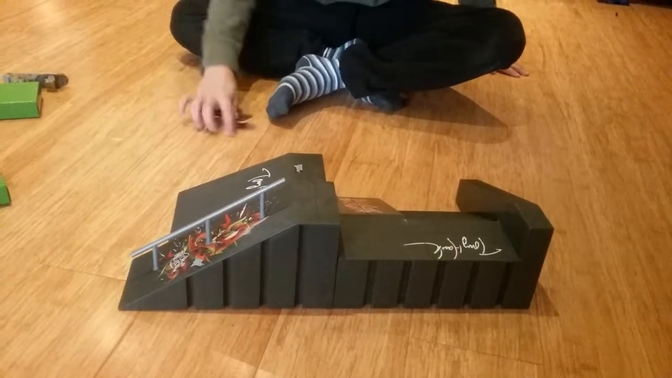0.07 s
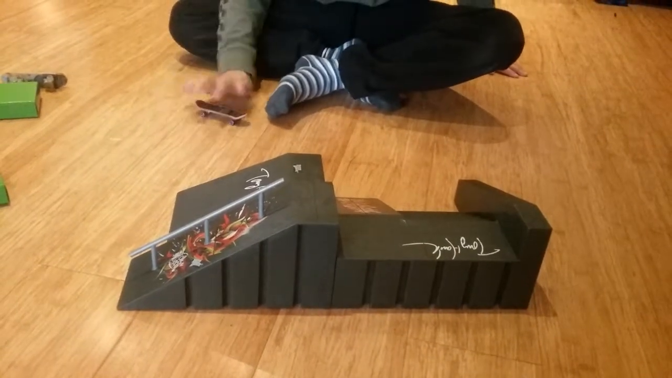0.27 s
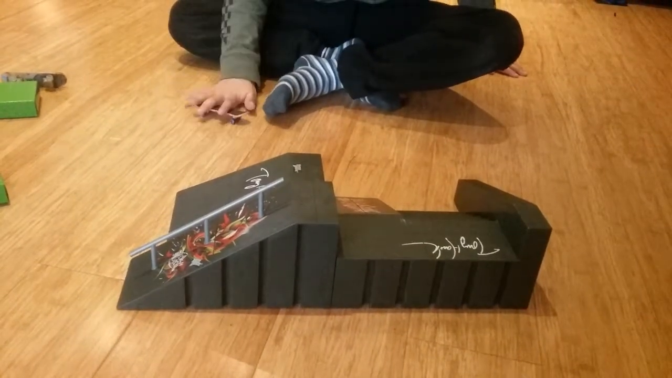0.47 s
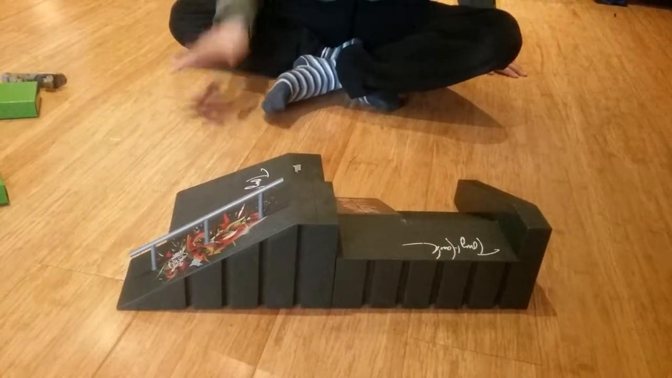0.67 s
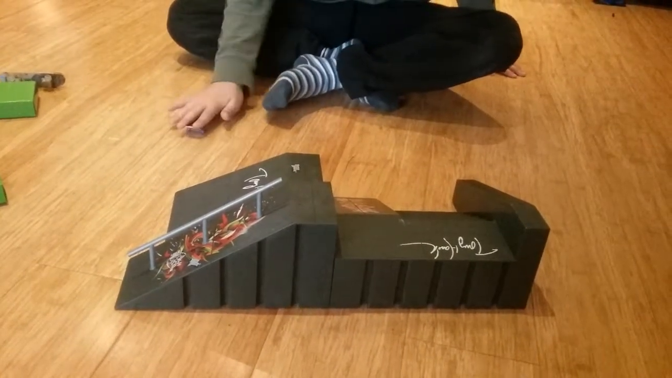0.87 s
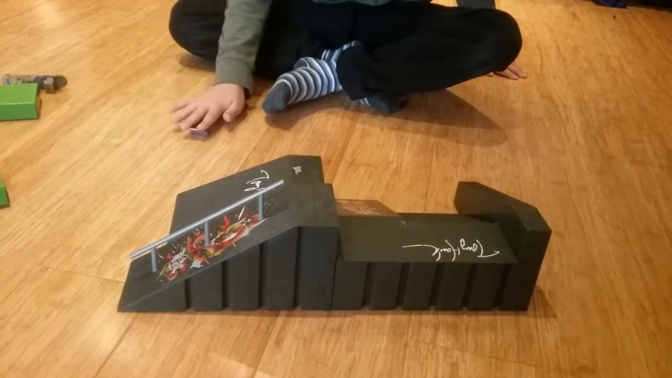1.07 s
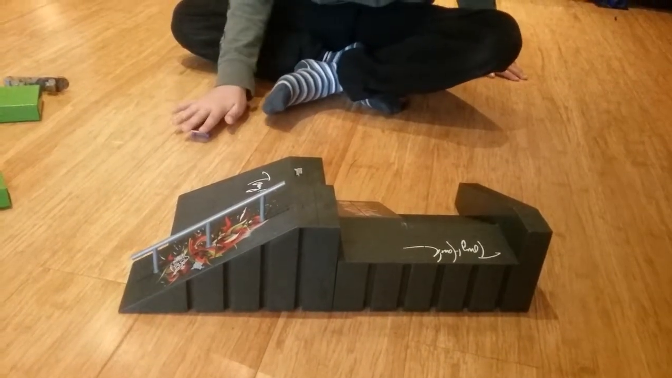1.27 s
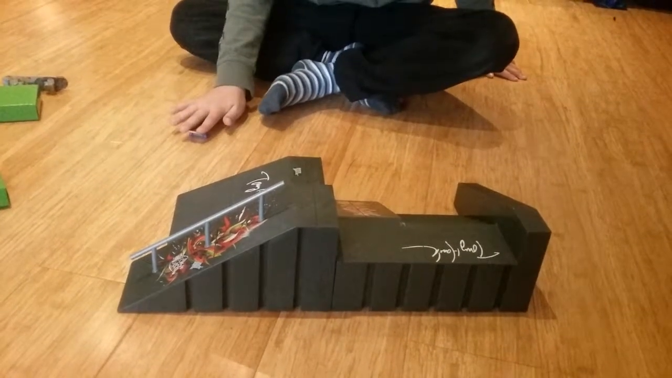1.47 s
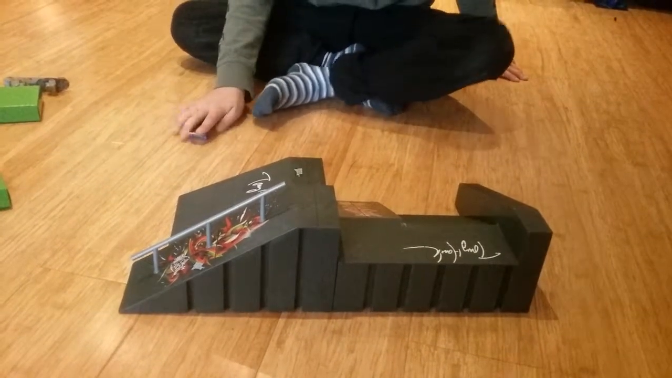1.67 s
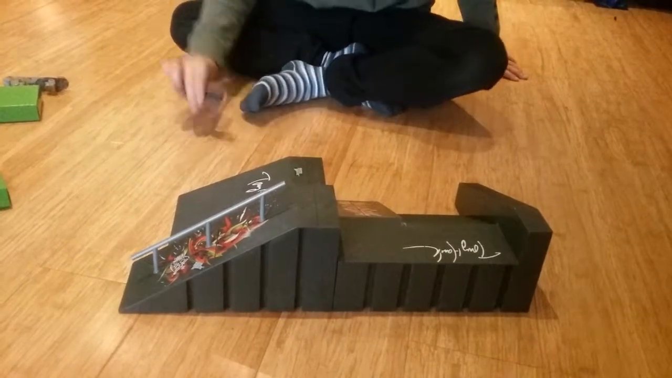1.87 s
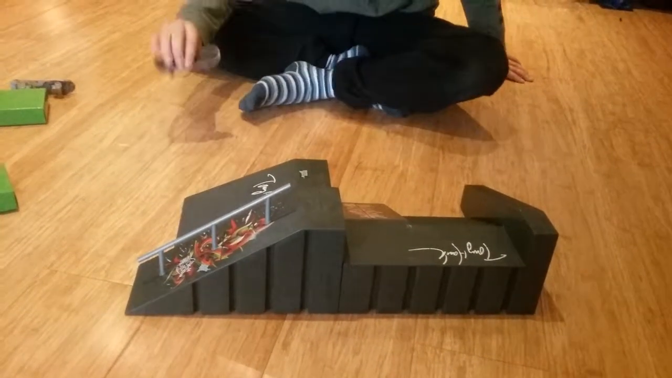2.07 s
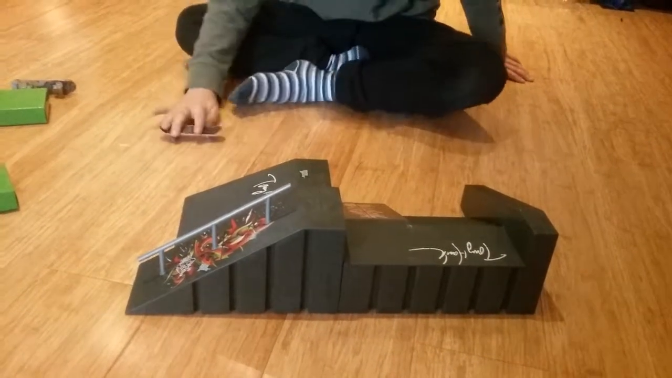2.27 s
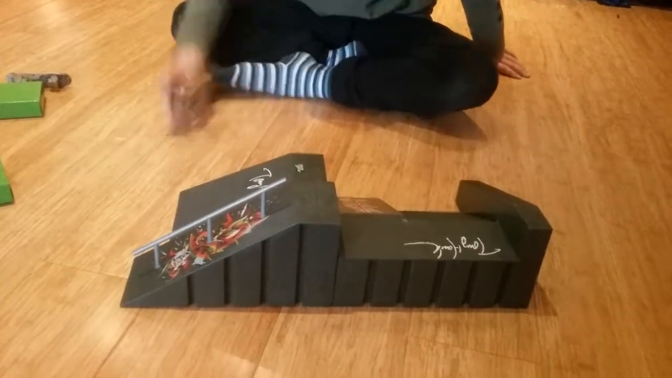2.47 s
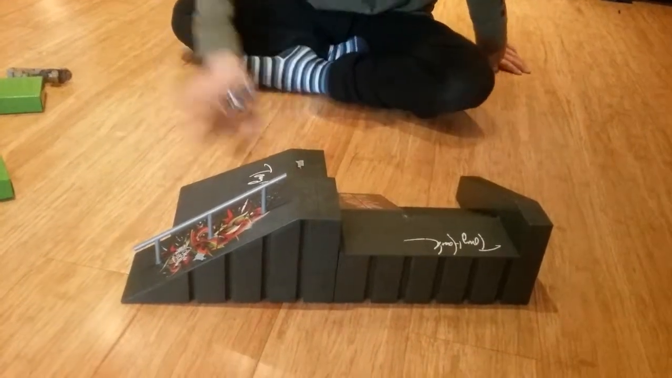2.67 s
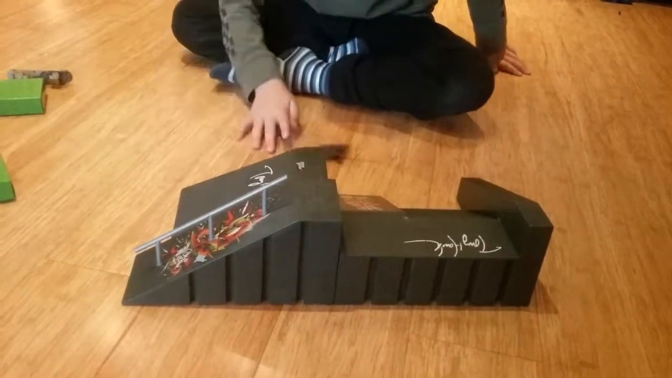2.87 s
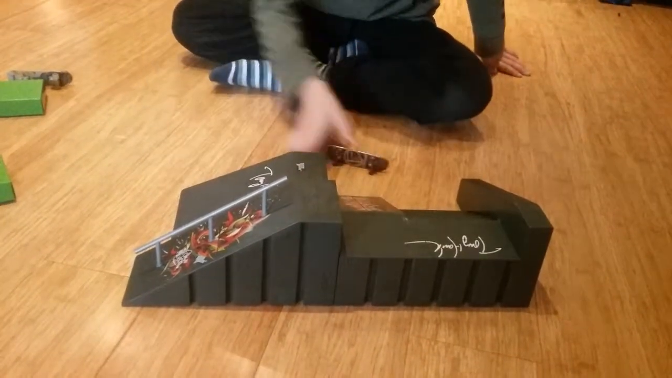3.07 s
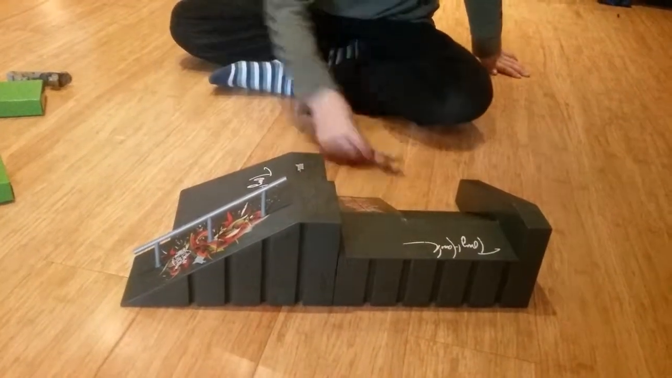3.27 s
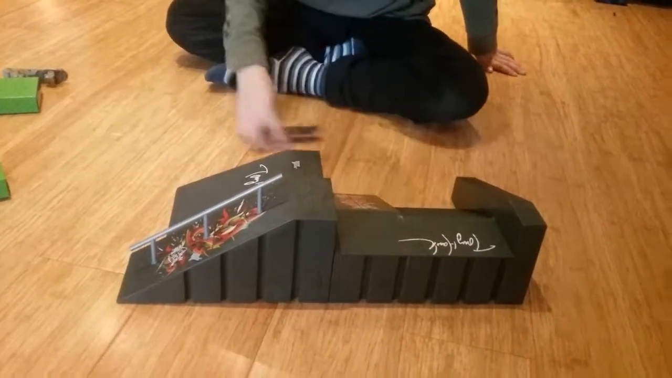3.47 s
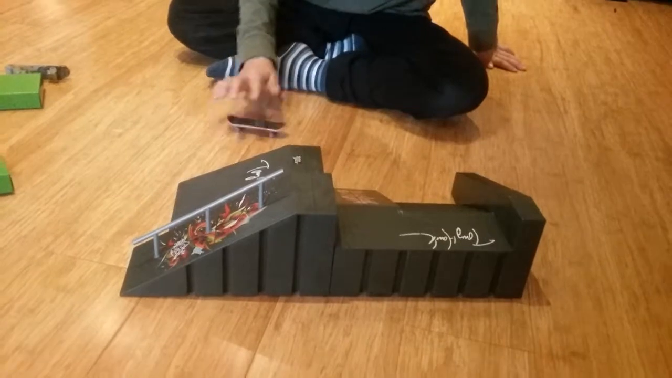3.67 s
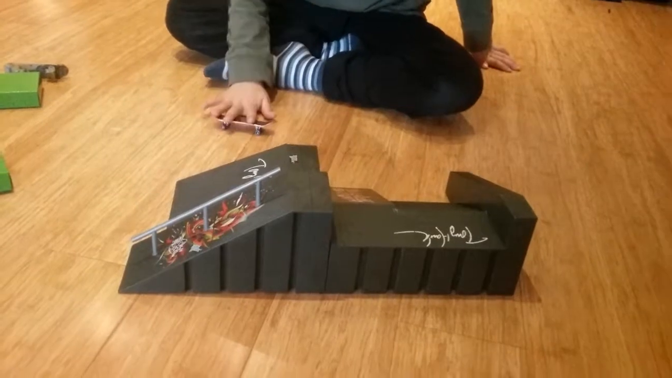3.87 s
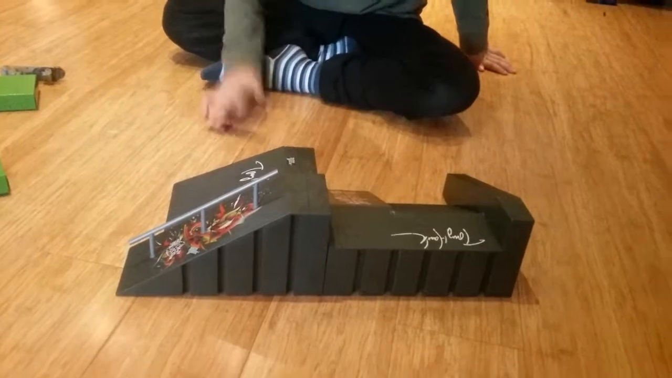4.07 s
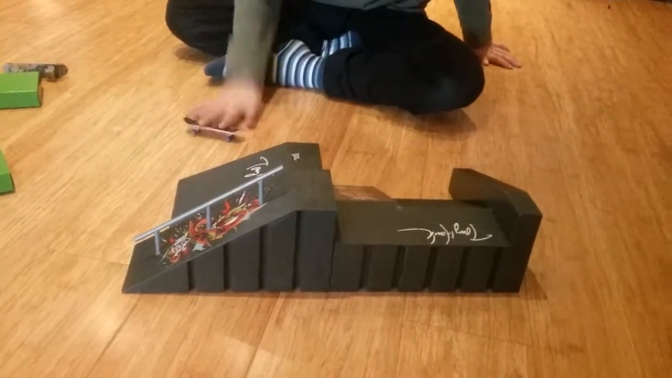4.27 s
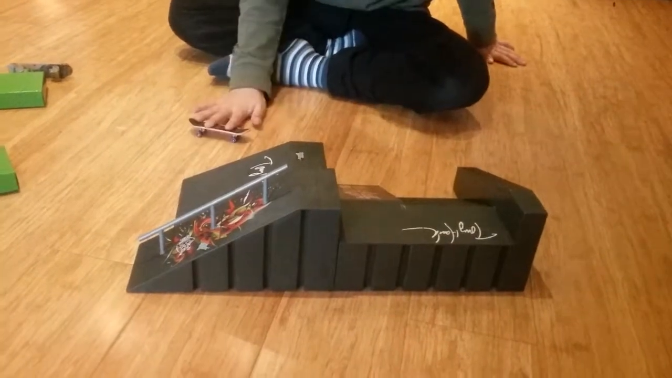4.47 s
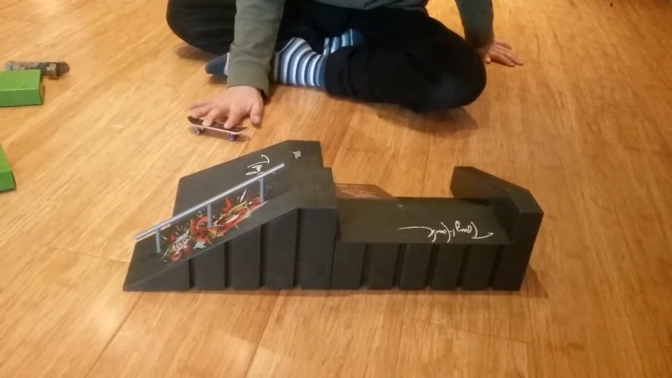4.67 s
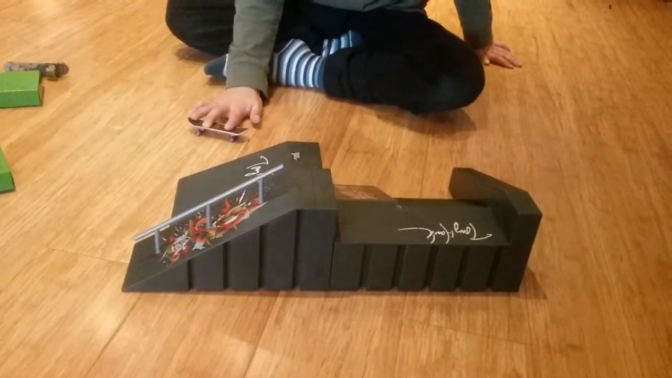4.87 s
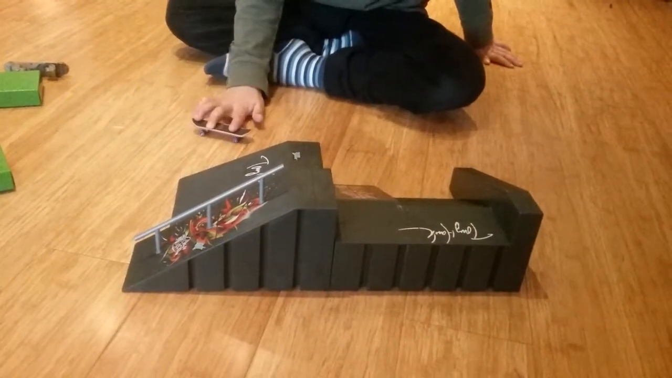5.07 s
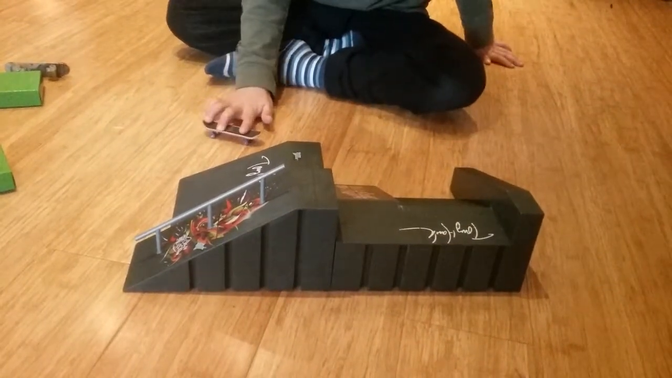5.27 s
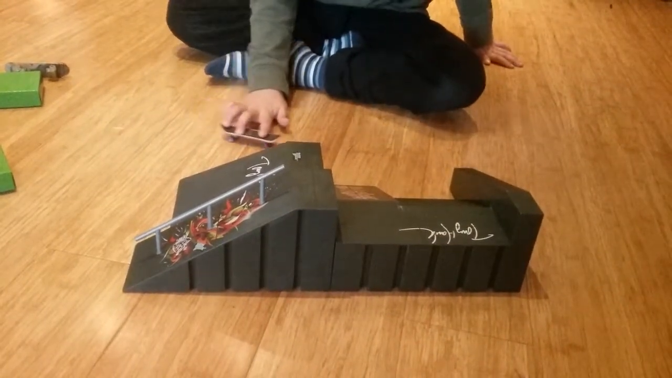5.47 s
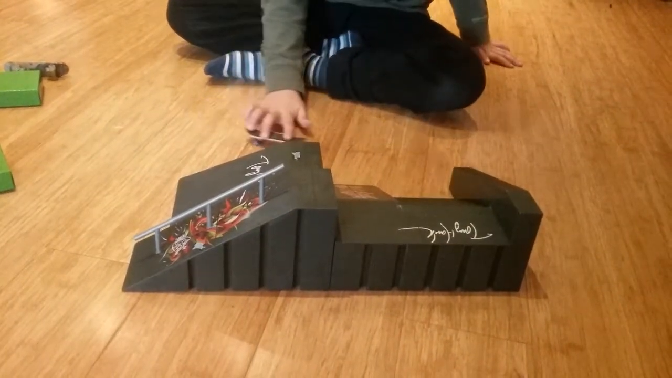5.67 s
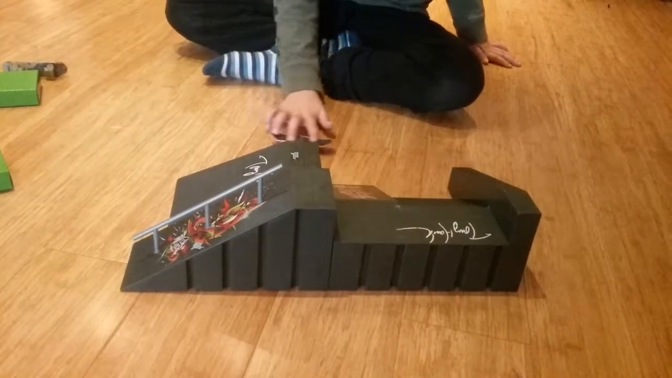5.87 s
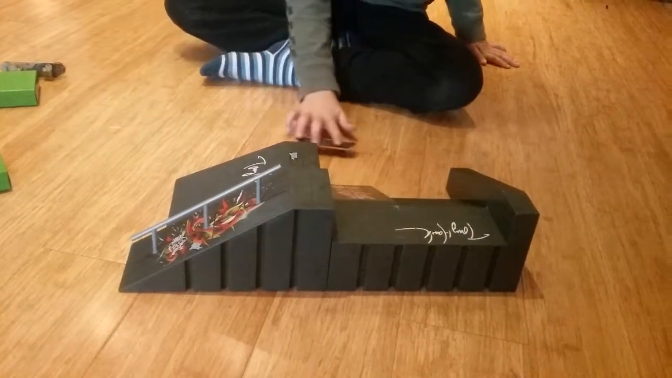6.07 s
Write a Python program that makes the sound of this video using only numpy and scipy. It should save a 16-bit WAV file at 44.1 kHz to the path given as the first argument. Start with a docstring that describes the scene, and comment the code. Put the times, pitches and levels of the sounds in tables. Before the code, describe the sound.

In a quiet, lightly reverberant room, a fingerboard clicks and clatters against nearby wooden floorboards. A few sharp clacks come first, then a lull with faint rubbing, then a busier run of snaps and landings with brief rolls and soft low bumps on the floor. The tricks finish with a loud, rapid slap, and after a pause the board rolls along softly, its wheels knocking lightly in the grooves.

```python
"""A fingerboard is popped, flipped and landed on a wooden floor in a live room, then rolls away.
Each impact excites the damped modes of the deck and its metal trucks. Between tricks the wheels roll
and bump over the grain, and the axles rub. Hand and feet brush the floorboards and thud on them,
launching dispersive bending waves. The room adds echoes, reverberation and standing waves;
beneath it all lie faint hiss, a low hum that stops early and a thin electronic whine."""
import sys
import numpy as np
from scipy import signal
from scipy.fft import rfft, irfft, next_fast_len
from scipy.io import wavfile

SR = 44100
rng = np.random.default_rng(int(sys.argv[2]) if len(sys.argv) > 2 else 0)


def unload_audio(sound):
    """Save the sound as a 16-bit wav file, at the path given as the first command line argument."""
    columns = np.transpose(np.atleast_2d(sound))
    # keep every value between -1 and 1, then stretch to whole-number steps
    steps = np.round(np.clip(columns, -1, 1) * 32767)
    wavfile.write(sys.argv[1], SR, steps.astype(np.int16))


N = 270099
TIME = np.arange(N) / SR
FREQS = np.fft.rfftfreq(4096, 1 / SR)
PUSH_S = 4.983  # start of the last, long push

# Broad response of the board on the floor: (frequency [Hz], gain [dB])
BOARD_RESPONSE = [(100, -38), (200, -32.5), (420, -16), (600, -5.5), (1000, -4.5), (1400, -5), (2000, -7),
                  (2700, -10.5), (4000, -8), (6600, -4.5), (7400, -5.5), (8300, -13.5), (12000, -16.5),
                  (16000, -17)]
# Modes of the board: (frequency [Hz], bandwidth [Hz], peak over the broad response [dB])
BOARD_RESONANCES = [(915.4, 160, 4), (1934, 370, 3), (3160, 170, 2), (3770, 460, 3.5), (5060, 750, 3),
                    (6210, 360, 4.5), (6737, 380, 5.5)]
# Contacts on the board, from the floor and from fingers pressing it before a pop: (time [s], level [dB], rattle
# decay [s], freedom to ring [factor], hardness [dB/octave], struck part's frequency [Hz], its peak [dB], direct
# left minus right [dB])
IMPACTS = [(-0.06, -10, 0.0023, 0.58, 5, 5440, 0.5, -2.0), (0.091, -24, 0.0022, 0.5, 1, 705, 19, -20),
           (0.0992, 10.0, 0.0016, 1.67, -2.5, 5700.0, 3, 6.5),
           (0.382, -18, 0.0058, 0.39, -8.5, 710, -2, -8.5), (0.3867, -15.0, 0.0021, 1.2, 1, 730, 6, -1.5),
           (0.569, -35, 0.0038, 0.4, 1, 9000.0, 5.5, 1), (0.589, -28.5, 0.0053, 0.5, -1, 1410.0, 10, 4.0),
           (0.5971, -4.0, 0.0054, 1.4, -1, 1760, 3.5, -2), (0.6345, -12, 0.0025, 0.52, 19, 6500, 4.5, -3.5),
           (0.747, 3.5, 0.0028, 1.15, -0.5, 1830, 7.0, -7), (0.799, 13, 0.0018, 2.08, 1.0, 1170, 4.5, -1.5),
           (1.0605, -31, 0.001, 0.92, 5, 6440, 5, 4), (1.869, -27, 0.0011, 0.62, 2.5, 7030, 9, -1),
           (2.137, -29, 0.0018, 0.8, 6, 5500.0, 4, -3), (2.267, 3.0, 0.00076, 1.3, 2.5, 665, 4.5, -3),
           (2.472, -23.5, 0.0043, 0.71, 1.5, 1320.0, 8, -3.0), (2.505, -16, 0.0064, 0.6, 2.5, 895, 11, 4),
           (2.51, 3, 0.0028, 1.94, 1.5, 2290, 5, -7), (2.5665, -4, 0.0019, 0.48, 17, 6300, 2, -6),
           (2.697, -22, 0.0021, 0.55, 8.5, 2200.0, 11, -6),
           (2.7808, -11.5, 0.0011, 0.46, 7.5, 5000.0, 0, 0.5),
           (2.8087, 12.5, 0.0012, 1.05, 2.5, 2790, 11.0, 1.0),
           (2.8208, 6, 0.00065, 0.35, -1.5, 2070, 10, -14), (3.2736, -6.5, 0.011, 0.7, 2.0, 3830, 6.5, -26),
           (3.2866, -10, 0.0012, 0.39, -1.0, 2780, 9, -4), (3.3904, -27.5, 0.0016, 0.6, 4.0, 6000.0, 6, -1),
           (3.4776, 4.5, 0.0045, 0.18, 4.5, 3870, 6, -10), (3.48, -5, 0.0013, 0.26, -6.5, 4500.0, 20, 12),
           (3.5479, -2.0, 0.00092, 1.1, -1.5, 3440, 6, -3.5),
           (3.8355, -10.5, 0.0049, 1.34, -7.0, 6500.0, 6, -7.5),
           (4.062, -36.5, 0.0021, 0.85, -5, 1540, 15, -13),
           (4.1146, -31.5, 0.002, 0.67, 4.0, 890, 12.5, 1.5),
           (4.1411, -0.5, 0.0019, 2, 2.0, 1860.0, 8, -13.5),
           (4.3084, 11.5, 0.0012, 1.7, 2, 2130, 15, -11.5),
           (4.3274, 9, 0.00073, 0.32, -4.5, 1568, 11.5, -9), (4.344, 12.5, 0.0012, 1.9, 0.5, 4800, 0.5, -8),
           (4.9721, -36, 0.0016, 0.37, 2.5, 2070.0, 4.5, 5)]
def clacks(part_octaves=0.51, tail_db=3.0, spill_db_per_db=0.21):
    """Impact excitation: the struck part rings most, hard contacts are brighter, a grip damps the modes."""
    out = np.zeros((2, N))
    body = curve_at(BOARD_RESPONSE, FREQS)
    modes = resonances(BOARD_RESONANCES, FREQS)
    octaves = np.log2(np.clip(FREQS, 780, 6000))  # hardness tilts this band
    for s, db, rattle_s, freedom, hardness_db, part_hz, part_db, pan_db in IMPACTS:
        # Floor and deck tail ring low, the deck in the middle, the trucks high.
        part = np.exp(-.5 * (np.log2((FREQS + 1) / part_hz) / part_octaves) ** 2)
        blow = ring(body + freedom * modes + hardness_db * octaves + part_db * part)
        path = contact_path(rattle_s, pan_db, tail_db + spill_db_per_db * db)  # strong blows spill more
        add(out, s, amp(db) * convolve(path, blow))
    return out


# The deck landing flat: (time [s], level [dB], frequency [Hz], time to fall 60 dB [s])
FLAT_LANDINGS = [(4.3285, -2, 1480, 0.013)]
def slaps(rise_s=0.0015, overtone_ratio=1.3, overtone_db=-6, pan_db=-2.0):
    """Damped free vibration: a flat landing radiates a short, woody ring of two partials."""
    out, t = np.zeros((2, N)), np.arange(2048) / SR
    for s, db, hz, t60 in FLAT_LANDINGS:
        phase = 2 * np.pi * hz * t
        deck = np.sin(phase) + amp(overtone_db) * np.sin(overtone_ratio * phase)
        envelope = (1 - np.exp(-(t / rise_s) ** 2)) * amp(-60 * t / t60)
        add(out, s, amp(db) * sides(pan_db) * deck * envelope)
    return out


# Response of the finger-damped deck: (frequency [Hz], gain [dB])
DAMPED_DECK = [(200, -29.5), (420, -21.5), (650, -1.5), (1100, 9), (1600, -1), (2600, -15.5), (3800, -15.5),
               (5000, -24), (6400, -13), (8300, -36.5), (16000, -49)]
# Wheels dropping into grain and joints: (time [s], level [dB], brightness [dB/octave])
WHEEL_DROPS = [(5.3544, -20.5, 3), (5.41, -36, 2), (5.4817, -15, -2.5), (5.6429, -17, -1),
               (5.6801, -11, 2.6), (5.704, -24.5, 8.5), (5.7671, -14, -1.5), (5.9027, -13, 0.5),
               (5.971, -22, -5), (6.0498, -21, 6), (6.0968, -22, 4)]
def bumps():
    """Damped impact: a wheel drops into a groove, and the fingers dull the deck's knock."""
    out, octaves = np.zeros((2, N)), np.log2(np.clip(FREQS, 500, 4000))
    for s, db, bright_db in WHEEL_DROPS:
        blow = ring(curve_at(DAMPED_DECK, FREQS) + bright_db * octaves)
        path = contact_path(rattle_s=0.0015, pan_db=-4, tail_db=-2.0)
        add(out, s, amp(db) * convolve(path, blow))
    return out


# Coasting after a landing: (start [s], duration [s], initial level [dB])
COAST_RUNS = [(2.818, 0.35, -44), (3.191, 0.059, -49.5), (3.516, .16, -45.5), (3.806, 0.022, -47.5)]
def rolling_strength(push_db=-50, run_up_s=.54, start_speed=.33, speed_power=2.59, slowing_db_per_s=44.5):
    """Power law of rolling noise: it grows with speed in the long push and fades as each coast slows."""
    run_up = np.clip((TIME - PUSH_S) / run_up_s, 0, 1)
    speed = start_speed + (1 - start_speed) * run_up ** 2  # share of full speed
    gain = amp(push_db) * (TIME > PUSH_S) * speed ** speed_power
    for s, length, db in COAST_RUNS:
        age = np.maximum(TIME - s, 0)
        settling = np.minimum(age / 0.027, 1)
        finger_stop = np.exp(-np.maximum(age - length, 0) / 0.02)
        gain += amp(db - slowing_db_per_s * age) * settling * finger_stop
    return gain


# Wheel noise through deck and floor: (frequency [Hz], gain [dB])
WHEEL_SPECTRUM = [(100, -31.5), (250, -29.5), (400, -16), (620, -1), (1150, 0), (1500, -4.5), (2100, -17),
                  (2600, -33.5), (4000, -34), (5000, -23.5), (6300, -22), (8300, -36), (16000, -39)]
def wheels(rolling):
    """Roughness excitation: the wood grain shakes the rolling wheels, and with them deck and floor."""
    return friction(rolling, WHEEL_SPECTRUM, per_s=880, spread_db=9.0)


def axle_whirr(band_hz=(1980, 2180), db=-72, length_s=0.52):
    """Narrow-band friction noise: the axles sing while the long push is still slow."""
    band = signal.butter(2, band_hz, "band", fs=SR, output="sos")
    rub = np.sqrt(N) * unit(signal.sosfilt(band, rng.standard_normal((2, N))))
    return amp(db) * np.sqrt(arch(PUSH_S, length_s)) * rub


# Spectrum of rubbing: (frequency [Hz], gain [dB])
RUB_SPECTRUM = [(100, -16), (400, -1.5), (1000, -11.5), (1500, -10.5), (2050, 0.5), (2800, -4.5),
                (4000, -2), (5000, -4.5), (6400, 1), (8300, -12), (16000, -17.5)]
# Strokes of fingers and board over the floor: (start [s], duration [s], level [dB])
RUB_STROKES = [(-.1, 0.27, -80.5), (1.202, 0.071, -71), (1.676, 0.22, -63.5), (1.832, 0.54, -67.5),
               (2.219, 0.24, -64.5), (2.512, 0.075, -60), (2.71, 0.54, -59.5), (3.185, 0.14, -52.5),
               (3.3, 0.92, -68), (4.048, 0.22, -63.5), (4.922, 0.26, -76)]
def brushing(rolling, axle_db=-16.5):
    """Sliding friction: each stroke swells and fades, and the axles rub in step with the wheel noise."""
    strokes = sum(amp(db) * arch(s, length) ** 0.99 for s, length, db in RUB_STROKES)
    return friction(strokes + amp(axle_db) * rolling, RUB_SPECTRUM, per_s=1900, spread_db=5.0)


def friction(gain, spectrum, per_s, spread_db):
    """Shot noise: countless tiny collisions with the wood grain sound through the board and the room."""
    sizes = amp(spread_db * np.minimum(rng.exponential(1, N), 4)) * rng.choice([-1, 1], N)
    collides = rng.random(N) < per_s / SR
    grains = np.sqrt(N) * unit(sizes * collides) * gain
    path = contact_path(rattle_s=0.00026, pan_db=-3.0, tail_db=1.0)
    response = convolve(path, ring(curve_at(spectrum, FREQS)))
    return convolve(response, grains)[:, :N]


# Soft blows of hand and feet: (time [s], level [dB], lower band edge [Hz], left minus right [dB])
FLOOR_BLOWS = [(0.091, -28.5, 180, -4), (0.374, -28, 170, -2.5), (0.591, -31.5, 191, 1),
               (0.747, -30, 192, -1.5), (0.795, -22.5, 62, -11), (2.265, -32.5, 149, -2),
               (2.435, -31, 172, 1), (2.503, -31.5, 152, 1), (2.539, -25.5, 65, 13), (2.596, -36.5, 84, 12),
               (2.806, -25, 60, 6.5), (3.476, -39, 129, 2), (3.713, -32.5, 74.4, 12.5),
               (3.826, -34.5, 173, 6), (4.094, -38, 54.7, 17), (4.156, -28.5, 108, 17.5),
               (4.328, -28.5, 55, 6)]
def thuds(top_hz=320, lag_s=0.011, lag_hz=70, tail_db=-7, scatter=0.86, scatter_s=0.075):
    """Dispersion: low bending waves lag and scatter at the planks' edges, so each thud sinks and blurs."""
    out, t = np.zeros((2, N)), np.arange(2048) / SR
    hz = np.fft.rfftfreq(SR // 4, 1 / SR) + 1
    group_delay = np.maximum(lag_s * (np.sqrt(lag_hz / hz) - np.sqrt(lag_hz / 600)), 0)
    travel = np.exp(-2j * np.pi * np.cumsum(group_delay) * (hz[1] - hz[0]))
    for s, db, low_hz, pan_db in FLOOR_BLOWS:
        band = signal.butter(3, [low_hz, top_hz], "band", fs=SR, output="sos")
        spectrum = signal.sosfreqz(band, hz, fs=SR)[1] / np.sqrt(hz)
        wave = unit(irfft(spectrum * travel))
        scattered = unit(rng.standard_normal(len(t)) * np.exp(-t / scatter_s))
        planks = unit((t == 0) + scatter * scattered)
        path = amp(tail_db) * room_tail()
        add(path, 0, np.array([planks, planks]))
        add(out, s, amp(db) * sides(pan_db) * convolve(path, wave))
    return out


# Echoes off nearby surfaces: (delay [s], left gain [dB], right gain [dB])
EARLY_REFLECTIONS = [(.0034, -14, -5), (.0113, -6, -17), (0.014, -15, -20), (0.0234, -13, -16)]
def contact_path(rattle_s, pan_db, tail_db, shared=0.59, rise_s=0.0012):
    """Multipath propagation: a contact's chatter arrives directly, as echoes and as a diffuse tail."""
    t = np.arange(1024) / SR
    chatter = rng.standard_normal((3, len(t))) * np.exp(-t / rattle_s) * (1 - np.exp(-t / rise_s))
    spectrum = rfft(chatter[:2] + shared * chatter[2])
    direct = unit(irfft(spectrum / np.sqrt(abs(spectrum) + 1e-12)))  # hard contacts have flatter spectra
    out = amp(tail_db) * room_tail()
    add(out, 0, direct * sides(pan_db))
    for delay, left_db, right_db in EARLY_REFLECTIONS:
        add(out, delay, direct * amp([[left_db], [right_db]]))
    return out / np.sqrt(np.sum(out ** 2) / 2)


# Reverberation time: (frequency [Hz], time to fall 60 dB [s])
REVERB_TIMES = [(80, 0.33), (200, 0.48), (600, 0.33), (1400, 0.4), (3500, 0.38), (6300, 0.39), (9000, 0.32),
                (15000, 0.32)]
# Sound thrown back by the walls: (frequency [Hz], level [dB])
WALL_SPECTRUM = [(300, 0.5), (700, 0.5), (1400, -1.5), (3500, -1), (6300, -2), (8500, -4), (15000, 0.5)]
def room_tail(build_s=0.0064, coherent_hz=330):
    """Diffuse reverberation: it builds up, each band decays at its own rate, and both sides share bass."""
    hz, t = np.fft.rfftfreq(256, 1 / SR)[:, None], np.arange(190) * 128 / SR
    real, imag = rng.standard_normal((2, 2, len(hz), len(t)))
    left, independent = real + 1j * imag
    coherence = np.exp(-.5 * (hz / coherent_hz) ** 2)
    right = coherence * left + np.sqrt(1 - coherence ** 2) * independent
    decay = amp(curve_at(WALL_SPECTRUM, hz) - 60 * t / curve_at(REVERB_TIMES, hz))
    tail = signal.istft(np.array([left, right]) * decay)[1]
    build_up = 1 - np.exp(-np.arange(tail.shape[1]) / SR / build_s)
    return unit(tail * build_up)


# Modes between floor and walls: (frequency [Hz], bandwidth [Hz], peak [dB])
ROOM_RESONANCES = [(367, 14, 9), (624, 13, 8), (737, 16, 7.5), (797, 16, 4), (893, 20, 3), (1415, 16, 4),
                   (1834, 14, 4), (1879, 14, 4)]
def standing_waves(sound):
    """Room resonance: standing waves reinforce and prolong narrow bands of the sound."""
    modes = resonances(ROOM_RESONANCES, np.fft.rfftfreq(16384, 1 / SR))
    return convolve(sound, ring(modes))[:, :N]


# Mismatch of the two microphone ports: (frequency [Hz], left minus right [dB])
PORT_MISMATCH = [(100, 1.5), (500, 0.5), (850, 1), (1250, 1.5), (1900, -3), (2700, 6), (3900, -4.5),
                 (5200, 1.5), (6200, 7), (7300, -2), (9500, 7.5), (12000, 4), (14500, -7.5)]
def ports(sound):
    """Interchannel level difference: two unlike ports colour left and right in opposite ways."""
    left = colour(sound[0], [(hz, db / 2) for hz, db in PORT_MISMATCH])
    right = colour(sound[1], [(hz, -db / 2) for hz, db in PORT_MISMATCH])
    return np.array([left, right])


# Still air and hiss: (frequency [Hz], relative level [dB])
AIR_SPECTRUM = [(20, -7), (45, -9.5), (80, 8), (120, -0.5), (250, -1), (500, -5), (1000, -8), (2000, -10.5),
                (4000, -17), (8000, -22.5), (12000, -19), (15000, -23.5)]
def background(air_db=-75, hum_db=-75.5, hum_hz=80, waver_hz=7, flutter_db=3, hum_stop_s=1.88):
    """Noise floor: broadband air, a randomly modulated hum that stops, an electronic whine on the right."""
    noise = rng.standard_normal((3, N))
    air = np.sqrt(N) * unit(colour(noise[:2] + 0.96 * noise[2], AIR_SPECTRUM))  # partly shared by the sides
    knots = np.linspace(0, N, 130)
    drift, flutter = (np.interp(np.arange(N), knots, row) for row in rng.standard_normal((2, len(knots))))
    hum_phase = 2 * np.pi * np.cumsum(hum_hz + waver_hz * drift) / SR
    running = np.exp(-np.maximum(TIME - hum_stop_s, 0) / 0.025)
    hum = np.sqrt(2) * amp(hum_db + flutter_db * flutter) * running * np.sin(hum_phase)
    whine = np.sqrt(2) * amp([[-91], [-74]]) * np.sin(2 * np.pi * 15600 * TIME)
    return amp(air_db) * air + hum + whine


def amp(db):
    """Decibels to amplitude ratio."""
    return 10 ** (np.asarray(db) / 20)


def sides(db):
    """Left and right gains for a level difference."""
    return amp(np.array([[db], [-db]]) / 2)


def unit(x):
    """Normalisation to unit energy in each channel."""
    return x / np.sqrt(np.sum(x ** 2, -1, keepdims=True) + 1e-20)


def arch(start_s, length_s):
    """A half-sine envelope."""
    return np.sin(np.pi * np.clip((TIME - start_s) / length_s, 0, 1))


def curve_at(points, hz):
    """Interpolation on a logarithmic frequency axis."""
    f, value = np.transpose(points)
    return np.interp(np.log(hz + 1), np.log(f + 1), value)


def resonances(modes, freqs):
    """Resonance curves: one Lorentzian peak in dB for each mode."""
    return sum(db / (1 + (2 * (freqs - hz) / width) ** 2) for hz, width, db in modes)


def ring(db):
    """Minimum phase: the causal, unit-energy impulse response of a body with this gain curve."""
    log_gain = np.log(amp(np.r_[db, db[-2:0:-1]]))
    spectrum = np.exp(np.conj(signal.hilbert(log_gain)))
    return unit(np.fft.ifft(spectrum).real[:len(db)])


def colour(x, points):
    """Zero-phase filtering by a gain curve."""
    size = next_fast_len(N + 4096)
    gain = amp(curve_at(points, np.fft.rfftfreq(size, 1 / SR)))
    return irfft(rfft(x, size) * gain, size)[..., :N]


def convolve(stereo, mono):
    """Convolution of each channel with one signal."""
    return signal.fftconvolve(stereo, mono[None], axes=1)


def add(mix, s, sound):
    """Superposition of a stereo sound at time s."""
    at = round(s * SR)
    sound = sound[:, max(-at, 0):]
    part = mix[:, max(at, 0):][:, :sound.shape[1]]
    part += sound[:, :part.shape[1]]


def scene():
    """Superposition: all sources on the floor drive the room's modes and are heard over the noise floor."""
    rolling = rolling_strength()
    rubbing = wheels(rolling) + brushing(rolling)
    floor = clacks() + slaps() + bumps() + rubbing + axle_whirr() + thuds()
    return ports(standing_waves(floor)) + background()


def record(dry):
    """Band limiting: a steep linear-phase low-pass removes the highest treble."""
    low_pass = signal.firwin(767, 15830, window=("kaiser", 8), fs=SR)
    return signal.oaconvolve(dry, low_pass[None], "same")


dry = scene()
out = record(dry)
unload_audio(out)
```